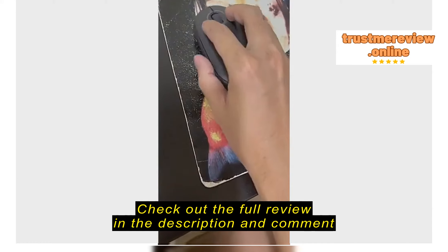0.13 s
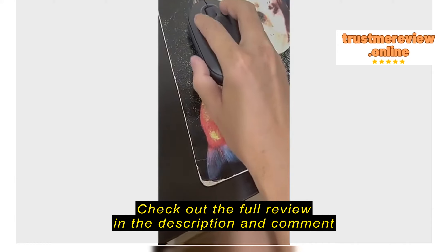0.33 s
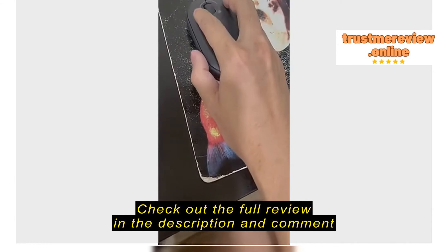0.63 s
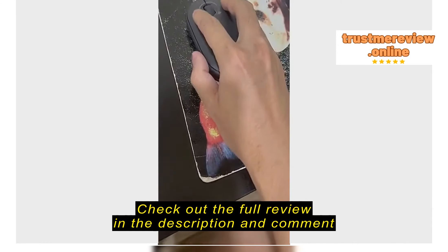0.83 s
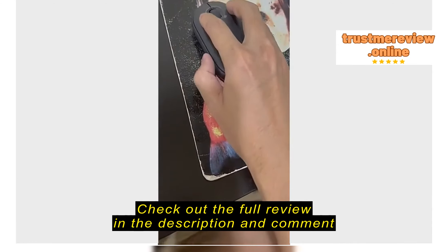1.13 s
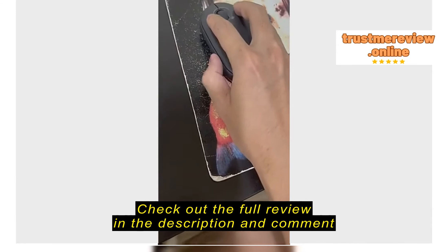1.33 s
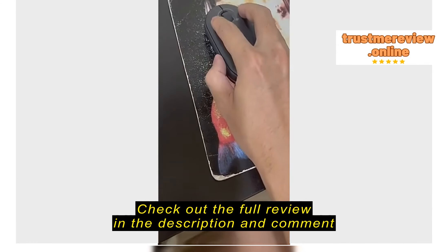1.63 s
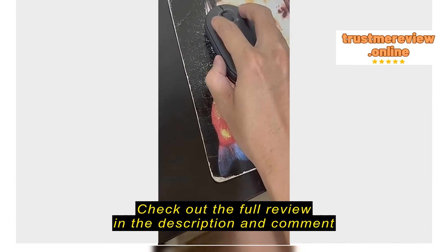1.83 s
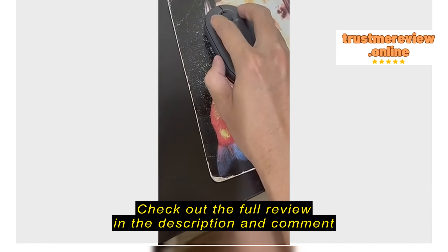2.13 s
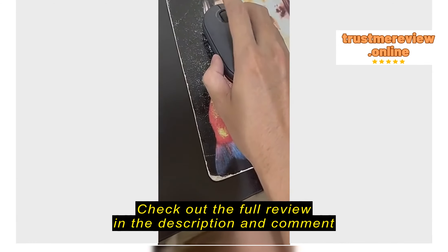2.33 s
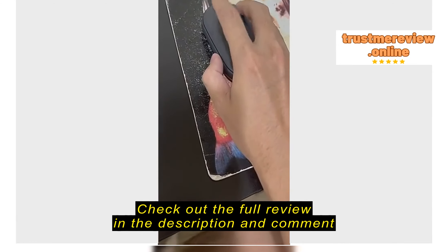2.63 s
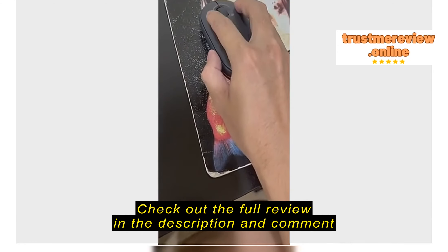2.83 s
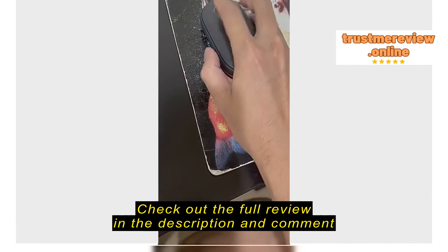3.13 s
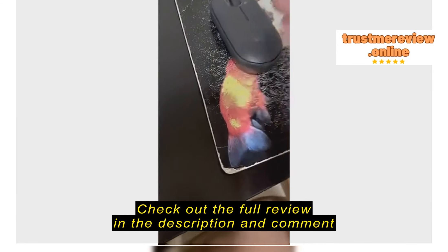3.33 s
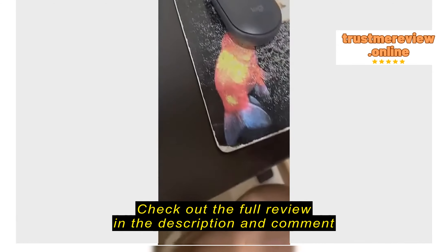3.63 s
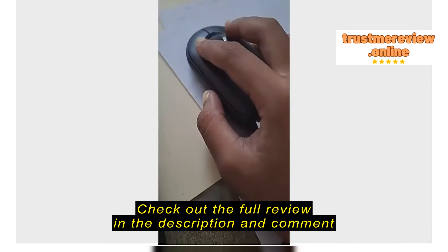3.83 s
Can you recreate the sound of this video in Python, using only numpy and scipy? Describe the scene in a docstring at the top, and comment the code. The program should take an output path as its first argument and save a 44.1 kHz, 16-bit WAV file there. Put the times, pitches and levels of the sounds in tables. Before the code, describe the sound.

A computer mouse slides grainily on a cloth pad, then its buttons click over low fan hum.

```python
"""A quiet room: a computer mouse on a cloth pad, close to a small stereo microphone.
It slides in grainy strokes, bumps the desk with soft low knocks and creaks once, then its buttons
click: ringing shell modes, a brittle noise burst and a brief echo. A fan motor hums, a compressor
drones as steady sines, a thin whine and shaped-noise air fill the room, and puffs of air cross the
microphone ports. Near the end the sound is cut off."""
import sys
import numpy as np
from scipy import signal
from scipy.fft import rfft, irfft
from scipy.io import wavfile
from scipy.ndimage import uniform_filter1d

SR = 44100
rng = np.random.default_rng(int(sys.argv[2]) if len(sys.argv) > 2 else 0)


def voltage_ratio(decibels):
    """Convert decibels (scalar or array-like) to amplitude ratios, 20 dB per decade."""
    exponent = np.asarray(decibels, float) / 20
    return 10 ** exponent


def log_audio(samples):
    """Write samples as a 16-bit WAV file to the path given in sys.argv[1]."""
    # one column per channel
    frames = np.atleast_2d(samples).T
    # limit to full scale, then quantise
    limited = np.clip(frames, -1, 1)
    pcm = np.round(limited * 32767).astype(np.int16)
    wavfile.write(sys.argv[1], SR, pcm)


N = 176400

# button snaps: (time [s], level [dB], treble boost [dB], low body boost [dB])
CLICKS = [(.8777, -39, 1.5, 0.9), (2.1536, -37.5, -5, -5), (2.32, -40, -3.5, -3.5),
          (2.4950, -40.5, -0.8, -3.2), (2.8502, -43, 1, 0), (2.8530, -46.5, 3, 7), (2.8582, -52, 0.7, 3.5),
          (3.6945, -39.5, -1, 3)]
CLICK_SIDE_DB = -9.5   # side against mid


def coloured(white, points):
    """Gives unit white noise a spectrum of (frequency [Hz], level [dB per Hz]) points."""
    hz, db = np.transpose(points)
    f = np.maximum(np.fft.rfftfreq(N, 1 / SR), 1)
    gain = voltage_ratio(np.interp(np.log(f), np.log(hz), db))
    return irfft(rfft(white) * gain * np.sqrt(SR / 2), N)


def rms_one(x):
    """Scales to rms 1."""
    return x / np.sqrt(np.mean(x ** 2) + 1e-20)


def drift(rate):
    """Slow random wandering of rms 1: noise low-passed near the rate [Hz], one value per 40 samples."""
    r = np.exp(-80 * np.pi * rate / SR)
    white = rng.standard_normal(N // 40 + 2002)
    slow = signal.lfilter([1], [1, -2 * r, r * r], white)[2000:]   # past the settling
    return np.interp(np.arange(N) / 40, np.arange(len(slow)), rms_one(slow - slow.mean()))


def ring(clicks, hz, t60):
    """A two-pole resonator: a unit click starts a sine of height 1 that falls 60 dB in t60 [s]."""
    r, w = voltage_ratio(-60 / (t60 * SR)), 2 * np.pi * hz / SR
    return signal.lfilter([0, np.sin(w)], [1, -2 * r * np.cos(w), r * r], clicks + 1e-18)


def stereo(mid, side):
    """Mid and side to left and right."""
    return np.array([mid + side, mid - side])


def grains(per_s):
    """Random catches of uneven size and either sign, mid and side."""
    caught = rng.random((2, N)) < per_s / SR
    size = voltage_ratio(1 * rng.exponential(1, (2, N)))   # 1 dB mean excess
    return caught * size * rng.choice([-1, 1], (2, N))


def sliding():
    """The feet catch on the weave in dense grains; the first strokes also shake shell and desk."""
    # strokes on the pad, joined by straight lines in dB: (time [s], level before the gains below [dB])
    slides = [
        [(0.0, -68.5), (0.018, -100), (0.024, -104), (0.096, -86), (0.428, -68), (0.482, -73), (0.51, -84),
         (0.584, -70.5), (0.678, -78.5), (0.718, -68.5), (0.752, -76), (0.808, -71.5), (0.865, -76)],
        [(0.92, -89), (0.962, -111), (1.008, -77), (1.034, -114), (1.212, -97), (1.356, -71.5), (1.436, -109.5),
         (1.636, -93), (1.76, -114), (1.826, -69.5), (1.938, -115), (2.092, -110.5), (2.1, -103)],
        [(3.4, -112), (3.444, -107), (3.47, -93.5), (3.476, -103), (3.488, -92), (3.52, -102), (3.526, -99),
         (3.56, -91), (3.57, -83.5), (3.616, -99), (3.65, -100), (3.662, -103), (3.67, -86)],
    ]
    # colour of the rub on cloth: (frequency [Hz], relative level [dB per Hz])
    rub_colour = [(500, -42), (900, -3.5), (1300, -4), (1760, -21.5), (2180, -8.5), (3010, -17.5),
                  (3860, -12), (5000, -16), (6300, -11.5), (7500, -20), (9700, -18)]
    # colour of the desk rumble: (frequency [Hz], relative level [dB per Hz])
    desk_colour = [(35, -8), (60, -4.5), (110, -12.5), (170, -22), (300, -22)]
    # drone of the shell while pushed hard: (time [s], level [dB])
    push = [(0.05, -72), (0.064, -74), (0.106, -93), (0.118, -74.5), (0.276, -80.5), (0.286, -69),
            (0.47, -64.5), (0.492, -76), (0.592, -66), (0.668, -83.5), (0.708, -68), (0.772, -65.5),
            (0.798, -74), (0.86, -92.5)]
    # shell resonances under the push: frequency [Hz]
    push_hz = [1150, 1310, 1470]
    rub_db, rub_side_db, rub_grains_per_s = 3.5, -8, 3700
    desk_db, desk_side_db, desk_ends_s = 19, -33.5, 0.91
    push_t60_s, push_grains_per_s = .035, 300

    t = np.arange(N) / SR
    sides = voltage_ratio(np.array([[0], [rub_side_db]]))
    stroke = voltage_ratio(np.interp(t, *np.concatenate(slides).T))
    rub = voltage_ratio(rub_db) * sides * [rms_one(coloured(g, rub_colour)) for g in grains(rub_grains_per_s)]

    desk_points = [(20, -67.5)] + desk_colour + [(600, -82)]   # steep ends
    desk = np.array([rms_one(coloured(w, desk_points)) for w in rng.standard_normal((2, N))])
    desk = desk * voltage_ratio(desk_db + np.array([[0], [desk_side_db]])) * (t < desk_ends_s)

    shell = sum(ring(grains(push_grains_per_s), hz, push_t60_s) for hz in push_hz)
    shell = rms_one(shell) * sides
    push_level = voltage_ratio(np.interp(t, *np.transpose(push), left=-200, right=-200))
    return stereo(*(stroke * (rub + desk) + push_level * shell))


def machines():
    """Fan hum at twice the mains rate with rotor sidebands, and drone sines; level and phase waver."""
    # hum partials: (multiple of the hum, multiple of the rotor rate)
    hum_orders = [(1, -2), (1, -1), (1, 0), (1, 1), (1, 2), (2, -3), (2, -2), (2, -1), (2, 0), (3, -5),
                  (3, -3), (3, -2), (3, 0), (4, -4), (4, -2), (4, -1), (5, -5), (5, -4), (5, -3)]
    # one per hum partial: rms level [dB]
    hum_db = [-52, -53, -66.5, -69, -73, -69, -65.5, -55, -71.5, -70, -56.5, -59.5, -64, -79.5, -70, -87,
              -77, -75, -85.5]
    # low drone: frequency [Hz]
    drone_hz = [45.0, 48.5, 54.5]
    # one per drone tone: rms level [dB]
    drone_db = [-53, -58.5, -63]
    hum_hz, rotor_hz = 100, 11.46
    waver_db, waver_rad, waver_hz = 1.5, 0.34, 2.7

    t = np.arange(N) / SR
    tones = [hum_hz * m + rotor_hz * k for m, k in hum_orders] + drone_hz
    out = np.zeros(N)
    for hz, db in zip(tones, hum_db + drone_db):
        level = np.sqrt(2) * voltage_ratio(db + waver_db * drift(waver_hz))
        phase = 2 * np.pi * (hz * t + rng.random()) + waver_rad * drift(waver_hz)
        out += level * np.sin(phase)
    return out


def whine():
    """A thin high sine whose level flutters at random."""
    whine_hz, level_db, flutter_db, flutter_hz = 2204, -75.5, 2, 12
    level = np.sqrt(2) * voltage_ratio(level_db + flutter_db * drift(flutter_hz))
    return level * np.sin(2 * np.pi * whine_hz * np.arange(N) / SR)


def air():
    """Air noise of fan and room: shaped noise, slightly uneven in level."""
    # middle of the room air: (frequency [Hz], level [dB per Hz])
    air_mid = [(25, -84.5), (38, -83), (50, -80.5), (70, -70.5), (95, -72), (135, -75.5), (160, -92),
               (192, -73.5), (215, -84), (270, -82.5), (320, -84.5), (440, -90.5), (500, -91.5), (700, -99),
               (1000, -100), (1500, -102), (2200, -102), (2700, -106), (3500, -113), (5000, -121),
               (6500, -121), (8500, -125), (9700, -128)]
    # its left-right difference: (frequency [Hz], level [dB per Hz])
    air_side = [(25, -120), (120, -112), (200, -99), (300, -99), (480, -96.5), (650, -95), (900, -101),
                (1300, -107), (1900, -125), (2300, -124), (2800, -112), (3600, -122), (4800, -126),
                (6000, -140), (9000, -138)]
    mid, side = rng.standard_normal((2, N))
    uneven = voltage_ratio(.5 * drift(10.5))   # 0.5 dB rms
    return uneven * stereo(coloured(mid, air_mid), coloured(side, air_side))


def patchy_treble(x):
    """Makes treble uneven: random time-frequency patches are dimmed or mildly raised, alike in both channels."""
    depth_db, from_hz, full_hz = 9, 2200, 4000
    hz, _, cells = signal.stft(x, SR, nperseg=512)
    patches = uniform_filter1d(rng.standard_normal(cells.shape[1:]), size=9, axis=1)   # along time
    patches = rms_one(uniform_filter1d(patches, size=2, axis=0))   # along frequency
    depth = depth_db * np.clip((hz - from_hz) / (full_hz - from_hz), 0, 1)[:, None]
    # rises are capped, deep dips doubled
    swing = np.minimum(patches, .5) * (1 + (patches < -.7))
    return signal.istft(cells * voltage_ratio(depth * swing), SR, nperseg=512)[1][:, :N]


def puffs():
    """Air crosses the microphone ports: low lumpy noise swells in and out, opposite in the channels."""
    # puffs: (middle [s], length [s], level [dB])
    puff_times = [(0.04, 0.22, -63), (0.317, .26, -44), (0.497, 0.23, -65.5), (1.087, 0.14, -67),
                  (1.494, .06, -71), (2.089, 0.085, -60), (2.484, 0.032, -63), (2.965, 0.086, -58),
                  (3.033, 0.067, -63), (3.217, .07, -57), (3.319, .09, -58.5)]
    # colour of a puff: (frequency [Hz], relative level [dB per Hz])
    puff_colour = [(20, -19), (45, -5), (100, 1), (160, -10), (300, -23), (600, -51), (1500, -100)]
    t = np.arange(N) / SR
    level = 0
    for s, length, db in puff_times:
        level = level + voltage_ratio(db) * np.cos(np.pi * np.clip((t - s) / length, -.5, .5))
    return stereo(0, level * rms_one(coloured(rng.standard_normal(N), puff_colour)))


def bumps():
    """Soft knocks swell in and die in the desk top as sines; the shell creaks once with rising pitch."""
    # bumps into the desk: (time [s], level [dB], frequency [Hz], t60 [s])
    knocks = [(0.402, -23.5, 73.5, 0.068), (.522, -37.5, 110.6, 0.096), (.866, -35, 70, 0.037)]
    # shell creak: (time [s], level [dB], from [Hz], to [Hz], length [s])
    creak = [(.82, -62, 2350, 2900, .022)]
    rise_s, pan_db = 0.0067, .5

    t = np.arange(N) / SR
    out = np.zeros(N)
    for s, db, hz, t60 in knocks:
        age = np.maximum(t - s, 0)
        level = voltage_ratio(db - 60 * age / t60) * np.minimum(age / rise_s, 1)
        out -= level * 2 * np.sin(2 * np.pi * hz * age)

    s, db, from_hz, to_hz, length = creak[0]
    part = np.clip((t - s) / length, 0, 1)
    stutter = rms_one(ring(rng.standard_normal(N), 220, 0.015))   # roughens the creak
    cycles = length * part * (from_hz + (to_hz - from_hz) * part / 2)
    out += voltage_ratio(db) * stutter * np.sin(np.pi * part) * 2 * np.sin(2 * np.pi * cycles)
    return out * voltage_ratio(np.array([[pan_db], [-pan_db]]))   # slightly to the left


def buttons():
    """Each snap strikes the shell modes with strengths of its own; desk and walls echo briefly."""
    # mouse shell modes: (frequency [Hz], relative level [dB], t60 [s])
    shell = [(437, -6, 0.047), (764, -13.5, .018), (953, -7, 0.017), (1267, -4, 0.019), (1617, -3, 0.016),
             (1950, -10.5, 0.019), (2278, -12, .014), (2764, -15.5, .014), (3566, -18.5, 0.014),
             (4960, -24, 0.011), (5900, -26, 0.0069), (7990, -21.5, .01)]
    treble_from_hz, body_under_hz, scatter_db = 3000, 1400, 2.5
    build_up_cycles = 2.2   # the plastic takes a few cycles to ring fully
    echo_db, echo_t60_s, echo_gap_s = -15, .07, .004

    s, db, treble_db, body_db = np.transpose(CLICKS)
    chance = rng.standard_normal((len(CLICKS), len(shell), 2))
    out = np.zeros((2, N))
    for k, (hz, mode_db, t60) in enumerate(shell):
        level = db + mode_db + treble_db * (hz > treble_from_hz) + body_db * (hz < body_under_hz)
        height = voltage_ratio(level + scatter_db * chance[:, k, 0])
        hits = np.zeros((2, N))
        hits[:, (s * SR).astype(int)] = [height, height * voltage_ratio(CLICK_SIDE_DB) * chance[:, k, 1]]
        # a quickly damped resonator at the same pitch softens the onset
        r, w = np.exp(-hz / (build_up_cycles * SR)), 2 * np.pi * hz / SR
        swell = signal.lfilter([1 - r], [1, -2 * r * np.cos(w), r * r], hits + 1e-18) * 2 * np.sin(w)
        out += ring(swell, hz, t60)
    direct = stereo(*out)

    t = np.arange(SR // 4) / SR
    tail = rng.standard_normal((2, len(t))) * voltage_ratio(-60 * t / echo_t60_s) * (t > echo_gap_s)
    tail = tail / np.sqrt(np.sum(tail[0] ** 2))
    return direct + voltage_ratio(echo_db) * signal.fftconvolve(direct, tail, axes=1)[:, :N]


def crack():
    """The brittle crack of the switch spring: a short burst of bright noise at each snap."""
    # colour of the crack: (frequency [Hz], relative level [dB per Hz])
    crack_colour = [(900, -40), (2000, -1), (3500, 1.5), (5200, -7), (8000, -4.5), (10000, -9)]
    crack_db, t60_s, build_up_s = -17.5, .024, .0008
    t = np.arange(N) / SR
    level = 0
    for s, db, treble_db, _ in CLICKS:
        fall = voltage_ratio(db + treble_db + crack_db - 60 * np.abs(t - s) / t60_s)
        level = level + np.clip((t - s) / build_up_s, 0, 1) * fall
    mid, side = [rms_one(coloured(w, crack_colour)) for w in rng.standard_normal((2, N))]
    return level * stereo(mid, voltage_ratio(CLICK_SIDE_DB) * side)


def scene():
    """All sources together; the treble is made patchy in the sliding and air only."""
    hiss = patchy_treble(sliding() + air())
    return hiss + machines() + whine() + puffs() + bumps() + buttons() + crack()


def low_pass(x):
    """Removes everything above the highest recorded frequency."""
    return signal.sosfilt(signal.butter(12, 9640, fs=SR, output="sos"), x)


def record(dry):
    """Top and bottom are filtered off and the sound stops dead, leaving silence."""
    top_cut_hz, low_cut_hz, end_s = 9700, 34, 3.74315
    x = signal.sosfilt(signal.ellip(10, .3, 60, top_cut_hz, fs=SR, output="sos"), dry)
    x = signal.sosfilt(signal.butter(4, low_cut_hz, "high", fs=SR, output="sos"), x)
    mix = x * (np.arange(N) < end_s * SR)
    return low_pass(mix)


dry = scene()
out = record(dry)
log_audio(out)
```